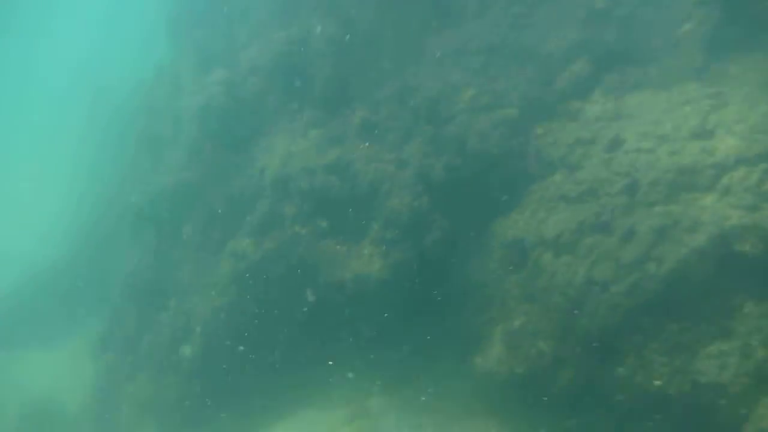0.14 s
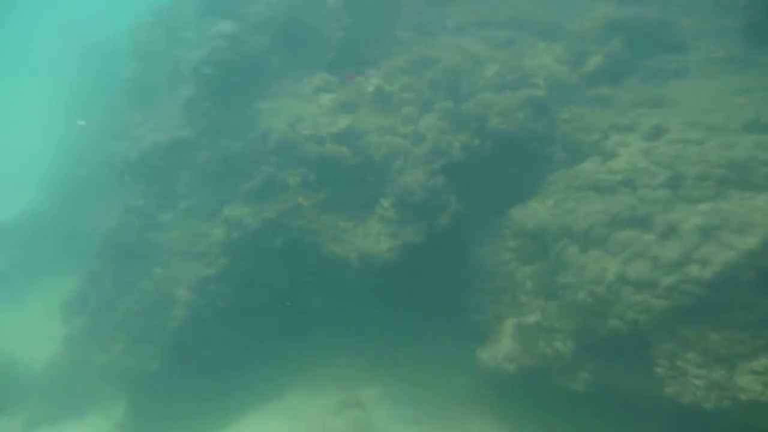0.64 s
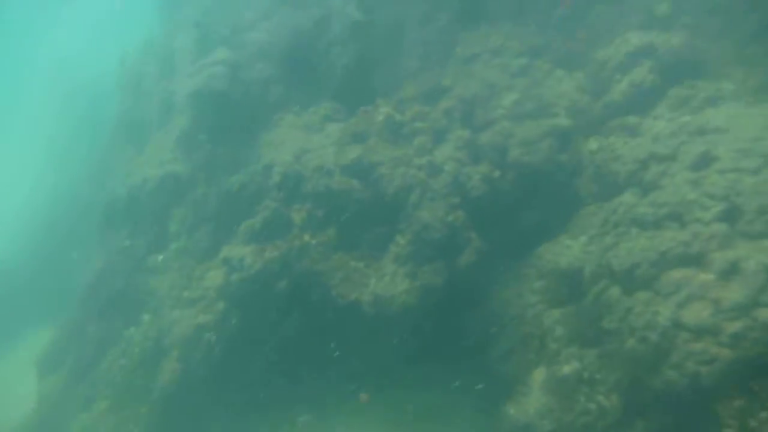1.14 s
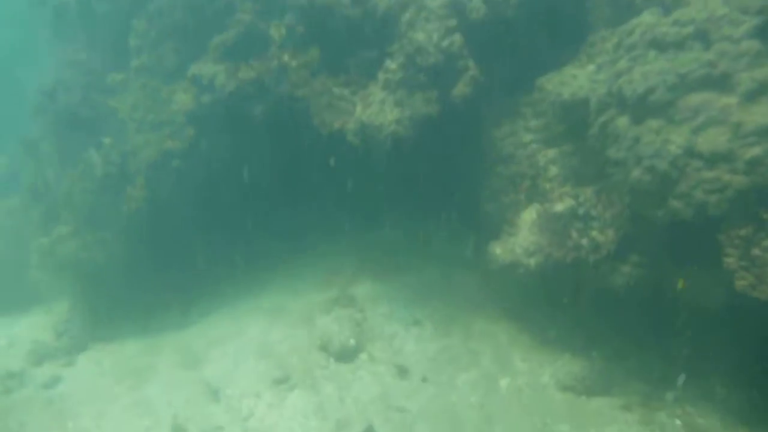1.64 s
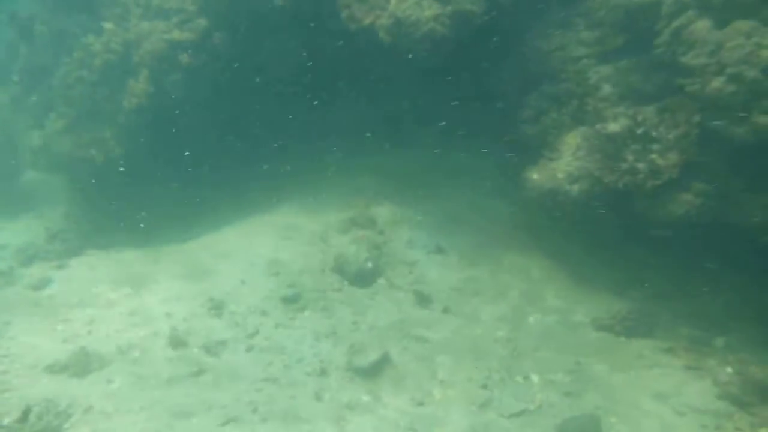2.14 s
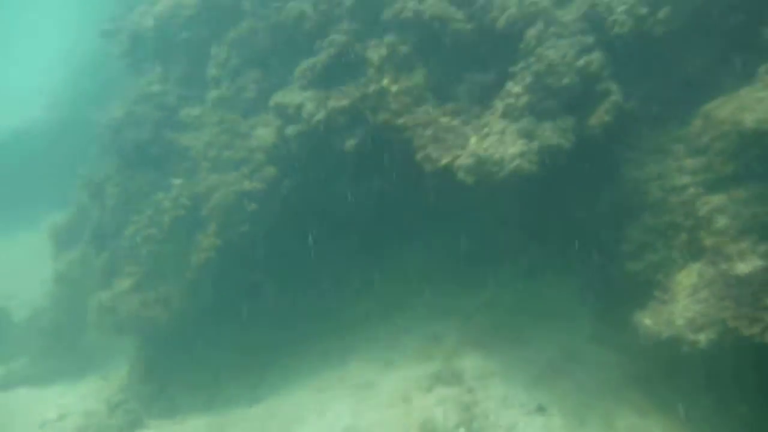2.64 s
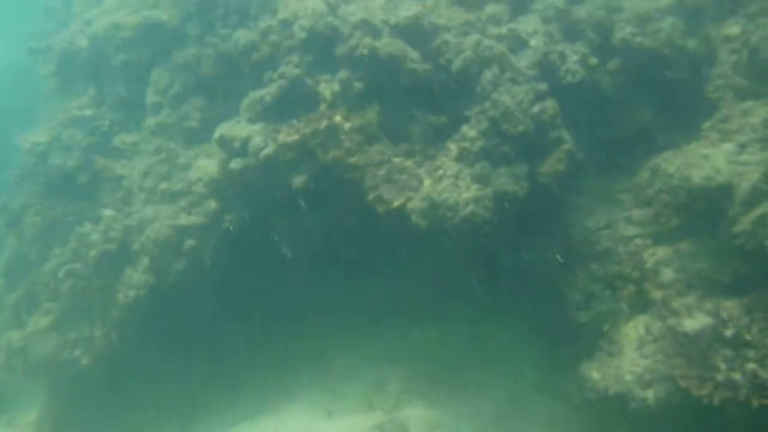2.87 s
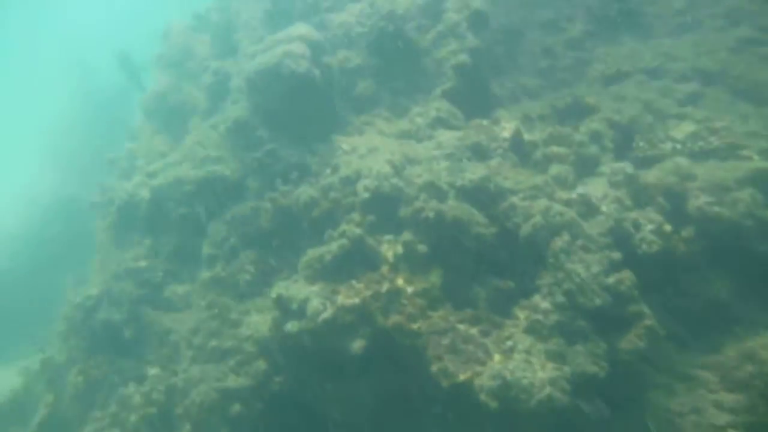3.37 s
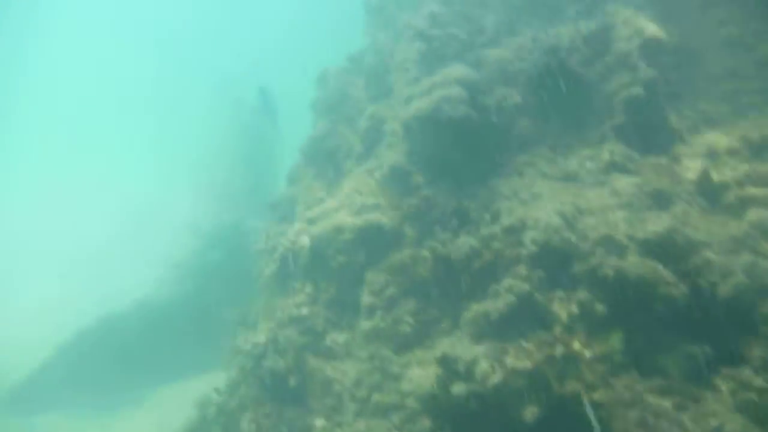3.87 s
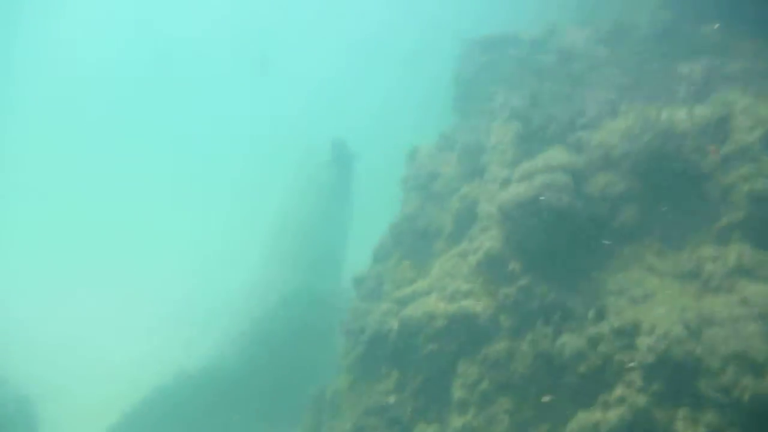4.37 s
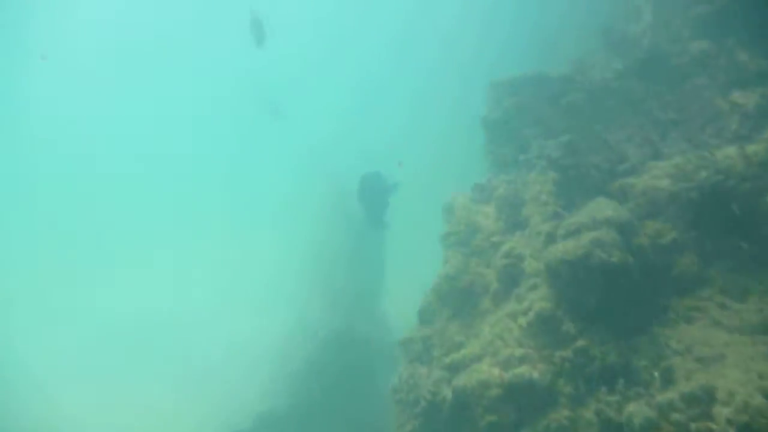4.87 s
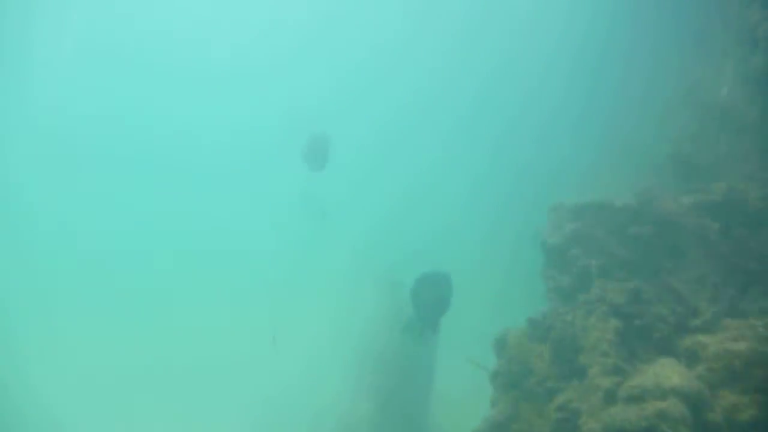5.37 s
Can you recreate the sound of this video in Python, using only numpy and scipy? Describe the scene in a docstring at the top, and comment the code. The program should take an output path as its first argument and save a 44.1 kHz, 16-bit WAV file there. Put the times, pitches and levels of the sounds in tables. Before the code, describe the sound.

Underwater beside a reef, a steady muffled hiss is peppered with tiny crackling clicks, two sharp louder snaps, and a few dull bumps on the camera case.

```python
"""Snapping shrimp, near and far along a shallow reef, ring the wall of a watertight camera housing:
each snap is a pressure impulse with an echo and scattered returns, filtered by damped wall modes.
Coloured noise makes the hiss of sea and preamplifier and the rustle of scrapes; low-band noise makes the
rumble of moving water; damped sines make bumps on the case and, near the end, a few escaping bubbles.
The camera ducks after loud peaks, cuts the bass, notches one narrow band and rolls off the top."""
import sys
import numpy as np
from scipy import signal
from scipy.fft import rfft, irfft
from scipy.io import wavfile
from scipy.ndimage import uniform_filter1d

SR = 44100
rng = np.random.default_rng(int(sys.argv[2]) if len(sys.argv) > 2 else 0)


def convert_level_to_amplitude(level_db):
    """Map a level in decibels to its linear amplitude factor."""
    exponent = np.asarray(level_db, float) / 20
    return 10 ** exponent


def to_wav(sig):
    """Store sig (one row per channel, or 1-D mono) as 16-bit WAV at the path in sys.argv[1].

    Samples outside -1..1 are clipped; the rate is SR.
    """
    pcm = np.clip(np.atleast_2d(sig), -1, 1) * 32767
    pcm = np.round(pcm).astype(np.int16)
    wavfile.write(sys.argv[1], SR, pcm.T)  # frames by channels


N = 242550  # length in samples, 5.5 s

# colour of the steady hiss: f/Hz, relative spectral level/dB
HISS_COLOUR = [(15, -50.5), (25, -43.5), (107, -6), (156, 0.5), (223, 2), (396, 0.5), (566, -2),
               (2000, -10.5), (2480, -16.5), (2920, -20.5), (3450, -20), (6120, -29), (7400, -52.5),
               (9620, -66), (16300, -120)]
# colour of the rustle: f/Hz, relative spectral level/dB
RUSTLE_COLOUR = [(150, -2), (700, -2), (2000, -4.5), (3300, 5), (4500, -0.5), (6300, -17), (7500, -0.5)]
# something scrapes along the case: start t/s, level/dB, length t/s
SCRAPE_EVENTS = [(3.71, -55, 0.083)]
# surges of water against the case: start t/s, level/dB, length t/s
WATER_SURGES = [(.725, -33.5, 0.033), (1.03, -44.5, 0.11), (2.1, -51, .01), (2.22, -50, 0.0088),
                (2.33, -48, 0.015), (2.6, -56, .01), (3.16, -40, .015), (3.58, -48, 0.043),
                (3.72, -50.5, 0.077), (4.4, -57, .01), (5.28, -61, .01)]
# individual snaps: t/s, relative level of low, middle and high ring/dB (three columns), favoured low f/Hz
NEAR_SNAPS = [(0.0264, -39, -42, -54, 1510), (0.0827, -43, -42, -52, 2000), (0.2251, -55, -47, -56, 1510),
              (0.2789, -52, -45, -49, 1580), (0.3027, -36, -34.5, -46, 2320), (0.442, -37, -56, -75, 1840),
              (0.4533, -48, -40.5, -67, 1680), (0.5188, -33.5, -25.5, -37, 2130),
              (0.5361, -34.5, -57, -71, 1740), (0.571, -31, -62, -72, 1660), (0.6111, -33, -43, -45, 1590),
              (0.6219, -39, -36.5, -36.5, 2090), (0.6422, -36, -61, -68, 1570),
              (0.7084, -53, -63, -51.5, 1780), (0.742, -24.5, -45, -68, 1900),
              (0.8029, -30, -24, -39.5, 2020), (0.8175, -54, -52, -49.5, 1660),
              (0.8874, -45, -43.5, -53.5, 1660), (0.9433, -48, -51, -47, 1520),
              (0.9718, -41, -50, -46, 1620), (0.9901, -25.5, -22, -32.5, 1960),
              (1.0699, -34.5, -63, -72, 1820), (1.1046, -31.5, -56, -70, 1710),
              (1.1364, -34.5, -61, -63, 1630), (1.1564, -54, -43.5, -50, 1750),
              (1.1761, -37, -62, -71, 1720), (1.2865, -57, -42, -53, 1680), (1.8315, -41, -45, -61, 1720),
              (1.8924, -40, -40, -56, 2010), (1.988, -44, -44, -49, 2250), (2.0484, -37, -41.5, -42, 1610),
              (2.3772, -36.5, -60, -71, 1840), (2.4029, -38, -46, -51, 1680), (2.4124, -52, -61, -49, 1690),
              (2.4284, -41, -37.5, -51.5, 2270), (2.4713, -37, -62, -72, 1800),
              (2.5002, -30, -40, -50.5, 2420), (2.5778, -7, -16, -34.5, 1760),
              (2.6384, -28.5, -44, -51.5, 1990), (2.6775, -29, -44, -71, 1880),
              (2.7223, -52, -42.5, -49, 2190), (2.8574, -62, -42.5, -56, 1740),
              (2.9286, -8.5, -16.5, -38, 1750), (2.9577, -34, -60.5, -67, 2090),
              (2.9942, -29, -38.5, -49, 1990), (3.3858, -32, -38, -48, 2000),
              (3.5232, -53.5, -45, -44.5, 2000), (3.7872, -39, -34.5, -56, 1780),
              (3.8331, -53, -37, -42, 1600), (3.8454, -50, -40, -66, 1600), (4.0671, -46, -45, -55, 1700),
              (4.1338, -41, -37.5, -37.5, 1510), (4.209, -30.5, -38.5, -53, 1700),
              (4.2312, -58, -39, -50, 1510), (4.3127, -35.5, -55, -61, 1550), (4.4066, -34, -58, -71, 1750),
              (4.4412, -32.5, -59, -71, 1690), (4.4575, -53, -44, -50, 2230), (4.4726, -33, -62, -66, 1660),
              (4.4823, -37, -34.5, -47, 1650), (4.5029, -41, -35.5, -47.5, 2190),
              (4.5308, -39, -45, -47, 1600), (4.5793, -30.5, -50.5, -68, 1680),
              (4.6615, -18.5, -23.5, -46, 2240), (4.6797, -34, -58, -71, 1800),
              (4.7457, -38, -59, -71, 1600), (4.8275, -53, -45, -51, 2060), (4.8799, -27, -45.5, -73, 1600),
              (4.9091, -38, -40, -48.5, 1830), (4.9737, -34, -62, -70, 1680), (5.0083, -35, -58, -71, 1770),
              (5.0404, -33, -56, -80, 1600), (5.2411, -31, -59, -68, 1660), (5.3253, -53, -45, -56.5, 1680),
              (5.4473, -36.5, -56, -65, 1770)]
# modes of the housing wall: f/Hz, 60 dB decay time t/s, relative level/dB
WALL_MODES = [(930, 0.013, -18.5), (1660, 0.018, -6.5), (1960, 0.0067, 2.5), (2336, 0.0054, 5.5),
              (3390, 0.0063, 1), (3694, .008, -3.5), (4300, 0.0067, -5), (5280, 0.0044, -2.5),
              (6120, 0.0037, -2), (7330, 0.0026, 0.5)]
# limits of the low, middle and high mode groups: f/Hz
GROUP_LIMITS_HZ = [800, 2900, 4800, 8000]
# gain of the low, middle and high mode groups: level/dB
GROUP_GAIN_DB = [-2, 0, 5.5]
# base level of distant snaps in the low, middle and high groups, before their spread: relative level/dB
FAR_SNAP_DB = [-58, -71, -81]
# bumps on the case: t/s, level/dB, ring period t/ms, sign of the push
CASE_BUMPS = [(0.697, -33, 10, 1), (0.7318, -22.5, 5.7, 1), (.746, -23, 7.6, -1), (0.7529, -23, 3.6, 1),
              (0.7814, -20.5, 5.3, -1), (0.964, -28, 11.4, 1), (1.032, -28.5, 12, 1),
              (3.126, -29.5, 12, -1), (3.164, -23.5, 6.2, 1), (3.743, -31, 5.2, 1), (3.785, -28, 3.5, 1)]
# bubbles: t/s, level/dB, starting f/Hz, 60 dB decay time t/s
BUBBLE_RINGS = [(5.322, -38, 368, 0.07), (5.357, -42, 1040, 0.018), (5.36, -35, 473, 0.059),
                (5.38, -34.5, 1010, 0.065), (5.382, -34, 367, .04), (5.399, -30, 723, 0.057),
                (5.399, -36, 420, 0.046), (5.444, -30.5, 625, 0.14), (5.447, -34, 376, 0.077),
                (5.475, -43, 251, 0.059)]

HISS_DB, RUSTLE_DB, RUSTLE_DRIFT_DB = -47, -62.5, 1.22
SCRAPE_RISE_S, SCRAPE_FALL_S = 0.011, 0.008
SCRAPE_GRAINS_PER_S, SCRAPE_SPREAD_DB = 500, 3
RUMBLE_HZ, RUMBLE_WIDTH_HZ = 86.5, 90
FLOW_DB, FLOW_SWAY_DB = -62, 2  # the rumble between surges
SURGE_RISE_S, SURGE_FALL_S = 0.02, 0.04
FAR_SNAPS_PER_S, FAR_SPREAD_DB = 230, 5.5
ECHO_DB, ECHO_MS, ECHO_SPREAD_MS = -10.5, 2.8, 0.4
SCATTER_DB, SCATTER_T60_S = -24.5, 0.025
FAVOUR_DB_PER_OCTAVE = 14.5
# a snap whose low ring exceeds its middle ring by more than SOFT_FROM_DB swells more slowly
SOFT_FROM_DB, SOFT_MS_PER_DB, SOFT_MOST_MS, SOFT_DB_PER_MS = 9.5, 0.13, 2.6, 2
DUCK_FROM_DB, DUCK_SHARE, DUCK_RELEASE_S = -14.5, 0.28, 0.54  # share: dB of cut per dB above threshold
LOW_CUT_HZ, TOP_HZ = 73, 6716
NOTCH_HZ, NOTCH_WIDTH_HZ = 2900, 140


def walk(rate):
    """Band-limited random modulation: levels held 1 / rate s and slewed twice, with spread near 1."""
    hold = int(SR / rate)
    steps = np.repeat(rng.standard_normal(N // hold + 1), hold)
    return 1.68 * uniform_filter1d(uniform_filter1d(steps, hold), hold)[:N]


def unit(x, lo_hz, hi_hz):
    """Parseval's theorem: the spectral power within a band scales its rms to 1."""
    power, hz = np.abs(rfft(x)) ** 2, np.fft.rfftfreq(N, 1 / SR)
    in_band = (hz > lo_hz) & (hz < hi_hz)
    return x * N / np.sqrt(2 * power[in_band].sum())


def noise(spectrum, flicker_db, rate):
    """Spectral shaping of white noise, in half-octave bands whose levels flicker independently."""
    hz = np.fft.rfftfreq(N, 1 / SR) + 1  # the offset avoids log(0)
    points = np.array(spectrum, float)
    colour_db = np.interp(np.log(hz), np.log(points[:, 0]), points[:, 1])
    coloured = rfft(rng.standard_normal(N)) * convert_level_to_amplitude(colour_db)
    half_octaves = 2 * np.log2(hz / 20)
    out = np.zeros(N)
    for k in range(19):
        band = irfft(coloured * np.clip(1 - abs(half_octaves - k), 0, 1), N)
        out += band * convert_level_to_amplitude(flicker_db * walk(rate))
    return out


def swells(rows, rise_s, fall_s):
    """Exponential growth and decay: each event's envelope grows, holds for its length and dies away."""
    t = np.arange(N) / SR
    out = np.zeros(N)
    for s, db, length in rows:
        before = np.clip((s - t) / rise_s, 0, 50)
        after = np.clip((t - s - length) / fall_s, 0, 50)
        out += convert_level_to_amplitude(db) * np.exp(-before - after)
    return out


def ring(hz, t60, seconds, glide=0.):
    """Free damped oscillation: one mode struck at time zero, its pitch rising if glide is positive."""
    t = np.arange(int(seconds * SR)) / SR
    return np.sin(2 * np.pi * hz * t * (1 + glide * t / t60)) * 1000 ** (-t / t60)


def add(out, s, sound):
    """Linear superposition: a short sound is added in place at s seconds."""
    i = int(s * SR)
    out[i:i + len(sound)] += sound[:N - i]


def hiss():
    """Broadband random noise: the smooth, nearly steady hiss of sea and preamplifier."""
    return convert_level_to_amplitude(HISS_DB) * unit(noise(HISS_COLOUR, 0.8, 9), 250, 1200)


def rustle():
    """Friction noise: a brighter rustle that swells when grit or fingers brush the case."""
    grains = convert_level_to_amplitude(SCRAPE_SPREAD_DB * walk(SCRAPE_GRAINS_PER_S))
    scrape = swells(SCRAPE_EVENTS, SCRAPE_RISE_S, SCRAPE_FALL_S) * grains
    background = convert_level_to_amplitude(RUSTLE_DB + RUSTLE_DRIFT_DB * walk(2))
    return (background + scrape) * unit(noise(RUSTLE_COLOUR, 2.5, 40), 2300, 7000)


def water_rumble():
    """Flow noise: moving water as low-band noise of uneven level, strengthened by surges."""
    edges = [RUMBLE_HZ - RUMBLE_WIDTH_HZ / 2, RUMBLE_HZ + RUMBLE_WIDTH_HZ / 2]
    band = signal.butter(2, edges, "band", fs=SR, output="sos")
    push = convert_level_to_amplitude(FLOW_DB + FLOW_SWAY_DB * walk(12)) + swells(WATER_SURGES, SURGE_RISE_S, SURGE_FALL_S)
    return push * unit(signal.sosfilt(band, rng.standard_normal(N)), 30, 200)


def far_snaps():
    """Random arrivals: distant shrimp, many faint and few strong, each with its own colour."""
    count = int(FAR_SNAPS_PER_S * N / SR)
    chance = rng.random((count, 6))
    levels_db = FAR_SNAP_DB - FAR_SPREAD_DB * np.log(chance[:, 1:2] + 0.03) - 12 * chance[:, 2:5]
    return np.column_stack([chance[:, 0] * (N / SR - 0.1), levels_db, 1500 + 900 * chance[:, 5]])


def snap_paths(count, t):
    """Multipath propagation: a direct spike, one echo and decaying returns off rock and sand."""
    scatter = rng.standard_normal((count, len(t))) * 1000 ** (-t / SCATTER_T60_S)
    paths = convert_level_to_amplitude(SCATTER_DB) * scatter * (t > 0.001)
    paths[:, 0] = -1  # the direct spike
    echo_ms = ECHO_MS + ECHO_SPREAD_MS * rng.uniform(-0.86, 1, count)
    paths[np.arange(count), (echo_ms * SR / 1000).astype(int)] = -convert_level_to_amplitude(ECHO_DB)
    return paths


def smear(paths, rows, t):
    """Convolution with a tone burst: a dull snap's low ring swells over cycles of its favoured pitch."""
    dullness_db = rows[:, 1:2] - rows[:, 2:3] - SOFT_FROM_DB
    swell_ms = np.clip(SOFT_MS_PER_DB * dullness_db, 0.03, SOFT_MOST_MS)
    swell = np.sin(np.pi * np.clip((t + 0.5 / SR) * 1000 / swell_ms, 0, 1)) ** 2
    cycles = np.cos(2 * np.pi * rows[:, 4:5] * t)
    response = np.sum(swell * cycles ** 2, axis=1, keepdims=True)  # evens out the drive at that pitch
    burst = swell * cycles * convert_level_to_amplitude(SOFT_DB_PER_MS * swell_ms) / response
    return signal.fftconvolve(paths, burst[:, :128], axes=1)


def snaps():
    """Modal excitation: the spike, echo and scatter of every snap set the wall's damped modes ringing."""
    rows = np.vstack([NEAR_SNAPS, far_snaps()])
    t = np.arange(1024) / SR
    paths = snap_paths(len(rows), t)
    smeared = smear(paths, rows, t)
    out = np.zeros(N)
    for hz, t60, db in WALL_MODES:
        group = np.searchsorted(GROUP_LIMITS_HZ, hz) - 1
        gain_db = rows[:, 1 + group] + db + GROUP_GAIN_DB[group]
        # where the spike meets the wall decides which low mode rings most
        if group == 0:
            gain_db = gain_db - FAVOUR_DB_PER_OCTAVE * abs(np.log2(max(hz, 1500) / rows[:, 4]))
        arrivals = (paths if group else smeared) * convert_level_to_amplitude(gain_db)[:, None]
        spikes = np.zeros(N)
        for s, path in zip(rows[:, 0], arrivals):
            add(spikes, s, path)
        # the wall passes only a band around each group, so the ring builds over a cycle
        band = signal.butter(4, GROUP_LIMITS_HZ[group:group + 2], "band", fs=SR, output="sos")
        mode = signal.sosfilt(band, ring(hz, t60, 0.03))
        out += signal.fftconvolve(spikes, mode)[:N]
    return out


def bumps():
    """Impact of soft bodies: flesh and water give a rounded contact, then a low damped ring without click."""
    contact = np.hanning(48) / 24
    out = np.zeros(N)
    for s, db, ms, sign in CASE_BUMPS:
        thud = np.convolve(ring(1000 / ms, 6 * ms / 1000, 0.13), contact)
        add(out, s, sign * convert_level_to_amplitude(db) * thud)
    return out


def bubbles():
    """Bubble resonance: each bubble rings as a damped oscillator and rises a little in pitch."""
    out = np.zeros(N)
    for s, db, hz, t60 in BUBBLE_RINGS:
        add(out, s, convert_level_to_amplitude(db) * ring(hz, t60, 0.15, glide=0.055))
    return out


def scene():
    """Superposition of all the sound inside the housing, with the preamplifier's share of the hiss."""
    return (hiss() + rustle() + water_rumble() + snaps() + bumps() + bubbles())[None]


def gain_control(x):
    """Automatic gain control: loud peaks lower the gain just after they pass; it recovers slowly."""
    size = 441  # samples per 10 ms block
    blocks = np.abs(x[0, :N // size * size]).reshape(-1, size)
    peak_db = 20 * np.log10(blocks.max(axis=1) + 1e-9)
    duck_db = np.zeros(len(peak_db) + 1)
    for k, db in enumerate(peak_db):
        recovering = duck_db[k] * np.exp(-size / SR / DUCK_RELEASE_S)
        duck_db[k + 1] = max(recovering, DUCK_SHARE * (db - DUCK_FROM_DB))
    centres = (np.arange(len(duck_db)) + 0.5) * size
    return x * convert_level_to_amplitude(-np.interp(np.arange(N), centres, duck_db))


def top_cut(x):
    """Nothing passes above the cut-off."""
    return signal.sosfilt(signal.butter(12, 7560, fs=SR, output="sos"), x)


def record(dry):
    """Gain control and linear filtering: the camera ducks, cuts deep bass, notches and rolls off the top."""
    x = gain_control(dry)
    x = signal.sosfilt(signal.butter(2, LOW_CUT_HZ, "high", fs=SR, output="sos"), x)
    x = signal.lfilter(*signal.iirnotch(NOTCH_HZ, NOTCH_HZ / NOTCH_WIDTH_HZ, SR), x)
    # 0.5 dB passband ripple, 52 dB stopband attenuation
    x = signal.sosfilt(signal.ellip(6, 0.5, 52, TOP_HZ, fs=SR, output="sos"), x)
    return top_cut(x)


dry = scene()
out = record(dry)
to_wav(out)
```